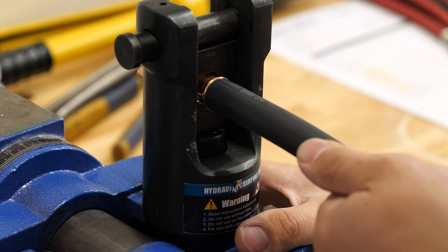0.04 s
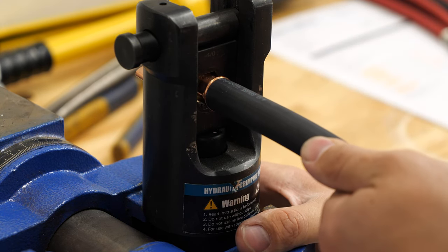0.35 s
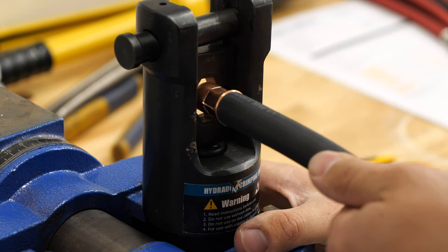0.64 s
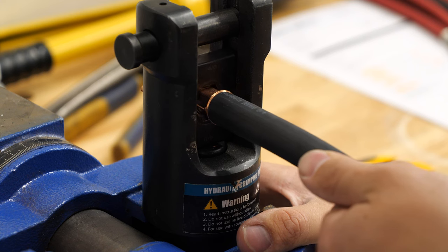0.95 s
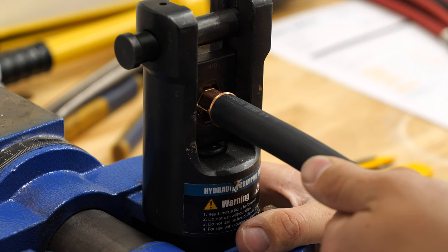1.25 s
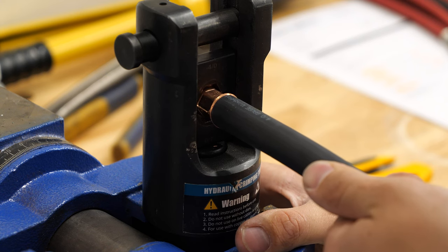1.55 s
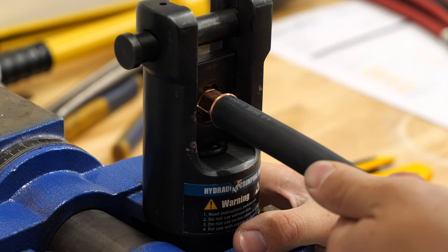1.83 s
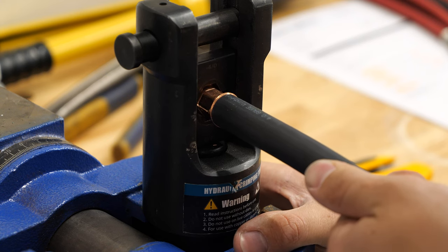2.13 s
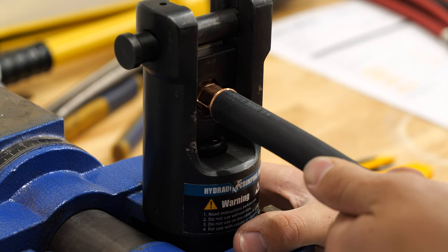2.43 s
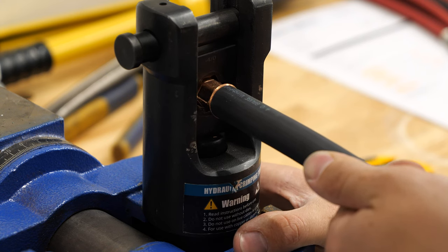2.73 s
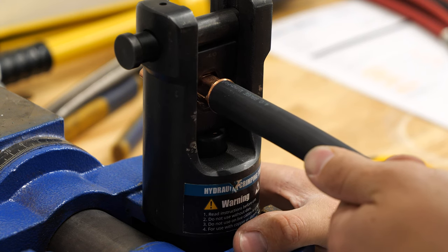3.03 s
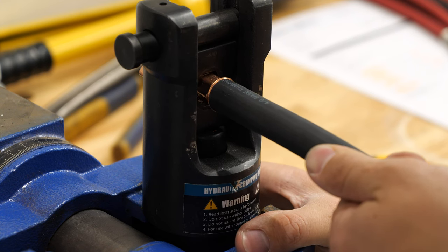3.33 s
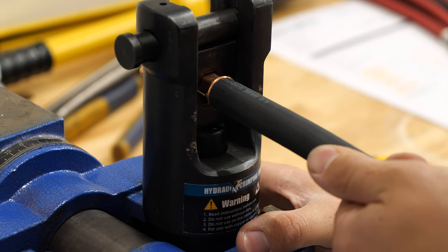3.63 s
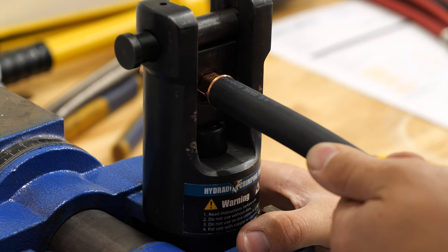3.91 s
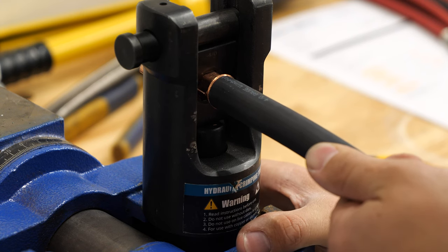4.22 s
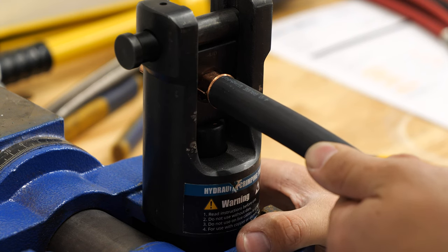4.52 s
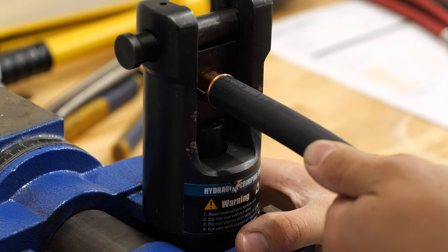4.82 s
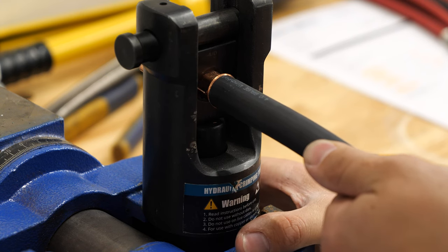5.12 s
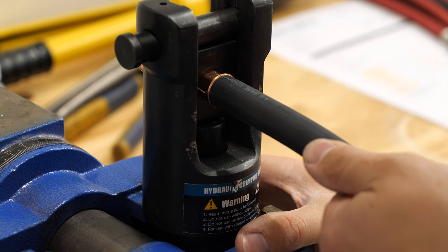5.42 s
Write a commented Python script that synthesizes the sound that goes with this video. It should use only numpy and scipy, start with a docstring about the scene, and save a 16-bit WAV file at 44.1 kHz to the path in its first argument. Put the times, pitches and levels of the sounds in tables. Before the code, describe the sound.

Small clicks and scrapes in a crimping tool, followed by a hydraulic foot pump's rapid clacking air bursts, slowing under load in a humming workshop.

```python
"""A workshop, one microphone close to a crimping tool, a machine humming steadily behind it.
First a cable lug is seated in the steel dies with a few taps, ticks, scrapes and faint squeaks.
At two seconds the air-driven hydraulic foot pump starts to close the tool: each stroke is a burst of
exhaust air cut short by the clack of the piston. The exhaust eases at first; then, as oil pressure
builds, the strokes come ever slower and blow harder."""
import sys
import numpy as np
from scipy import signal
from scipy.fft import rfft, irfft, next_fast_len
from scipy.io import wavfile
from scipy.ndimage import uniform_filter1d

SR = 44100
rng = np.random.default_rng(int(sys.argv[2]) if len(sys.argv) > 2 else 0)


def master_out(mix):
    """Clip the mix to full scale and print it as 16-bit PCM to the path in sys.argv[1]."""
    frames = np.transpose(np.atleast_2d(mix))
    ceiling = np.clip(frames, -1, 1)
    pcm = np.round(ceiling * 32767).astype(np.int16)
    wavfile.write(sys.argv[1], SR, pcm)


N = 245195
T = np.arange(N) / SR

# the pump cycles ever more slowly as the oil resists: time_s, cycle_s
PUMP_CYCLE = [(2.08, .06198), (2.77, .07343), (3.15, .07698), (3.3, .08391), (3.85, .0996), (4.02, .11017),
              (4.7, .17375), (4.85, .18733), (5.25, .23348)]


def piston():
    """The piston hits its stop and bounces, cracking and ringing the housing; the floor echoes it."""
    # strike and bounces on the stop, then a softer echo off the floor: delay_s, level_db
    arrivals = [(0.0, 2.5), (.0018, -0.5), (.004, -17), (.0058, -5), (0.011, -8)]
    # ring of the piston and its housing: pitch_hz, level_db
    housing_modes = [(3929, -16), (4791, -5), (5028, 0), (5211, -4), (6503, -5), (6750, -3), (7181, -2),
                     (7515, -2), (7795, -3), (8204, -5), (8430, -4), (8742, -7), (9119, -10), (10066, -12),
                     (10282, -11), (10637, -9), (11035, -8), (11854, -11), (12284, -12), (12467, -8),
                     (12704, -8), (14610, -14), (14922, -15), (15460, -14)]
    # crack of steel on steel: frequency_hz, density_db
    crack_spectrum = [(2500, -52), (3400, -43), (4400, -4), (5000, -6.5), (5700, -14.5), (7000, -0.5),
                      (8600, -0.5), (9600, -21), (12500, -7.5), (16000, -15.5)]
    _, strike_s, _, strike_db = strokes()
    pulses = 0
    for delay_s, db in arrivals:
        time_jitter, level_jitter = rng.standard_normal((len(strike_s), 2)).T
        arrival_s = strike_s + delay_s * (1 + 0.035 * time_jitter)
        pulses += clicks(arrival_s, strike_db + db + 150 * delay_s * level_jitter)
    impulse = clicks([0], [0])
    housing = sum((-1) ** k * from_db(db) * ring(impulse, hz, t60=.025)
                  for k, (hz, db) in enumerate(housing_modes))
    crack_energy = np.abs(convolve(pulses ** 2, dying(0.006) ** 2))
    crack = noise(crack_spectrum) * np.sqrt(crack_energy)
    # the main mode of the housing swells for two milliseconds after the first contact
    main_mode = ring(impulse, hz=5100, t60=.007) * (T / .0015) ** 2
    swell = convolve(clicks(strike_s, strike_db), main_mode)
    clack = from_db(-6) * convolve(pulses, housing) + from_db(3) * crack + from_db(5.5) * swell
    # so small a part radiates little below a few kilohertz
    return signal.sosfilt(signal.butter(3, 4000, "high", fs=SR, output="sos"), clack)


def exhaust(load):
    """A bright jet, the hollow tone of the muffler that grows with load, and a shudder of the body."""
    # escaping air: frequency_hz, density_db
    jet_spectrum = [(300, -16), (1900, -27), (2300, -25.5), (3200, -19.5), (4000, -9.5), (4400, -13),
                    (4800, -5.5), (5600, -12.5), (6700, -4.5), (8600, -5), (9500, -7.5), (11200, -7),
                    (14300, -15.5), (15600, -14.5)]
    # cavity resonances of the muffler: pitch_hz, width_hz, idle_db, full_load_db
    muffler_modes = [(487.7, 20, -53.5, -56), (629, 37, -53.5, -53.5), (900, 89, -53, -47),
                     (1019.6, 44, -47, -36), (1150.5, 25, -50, -42), (1515, 82, -47.5, -48.5),
                     (1729, 99, -43.5, -38), (1858, 28, -56.5, -46.5), (2455, 65, -55, -48),
                     (2820, 34, -57.5, -55)]
    # shaking pump body: frequency_hz, density_db
    shudder_spectrum = [(30, -6), (60, -5), (115, 4), (190, -17.5), (340, -6), (800, -11.5), (1500, -12)]
    _, _, air_db, _ = strokes()
    jet_flow = air_flow(air_db, rise_s=0.0038, hold_s=0.013, t60=0.079)
    jet = from_db(-0.43) * noise(jet_spectrum) * jet_flow
    # only a weak stroke, such as the first from rest, fails to drive the muffler and the body fully
    full_stroke_db = -31.5
    weak_db = np.minimum(air_db - full_stroke_db, 0)
    puff = air_flow(2 * weak_db, rise_s=0.0035, hold_s=0.0062, t60=0.063)
    hollow = 0
    for hz, width_hz, idle_db, full_db in muffler_modes:
        t60 = np.log(1000) / (np.pi * width_hz)
        drive = rng.standard_normal(N) * puff * from_db(idle_db + (full_db - idle_db) * load)
        hollow += ring(drive, hz, t60) * 2 * np.sqrt(np.pi * width_hz / SR)
    shaking = air_flow(weak_db, rise_s=0.0079, hold_s=0.037, t60=0.18)
    shudder = from_db(-45.5) * noise(shudder_spectrum) * shaking
    return jet + hollow + shudder


def air_flow(levels_db, rise_s, hold_s, t60):
    """Air blows from the opening of the valve until just after the strike, then the chamber empties."""
    flow = np.zeros(N)
    open_times, strike_times, _, _ = strokes()
    for open_s, strike_s, db in zip(open_times, strike_times, levels_db):
        part = slice(int((open_s - rise_s) * SR), int(open_s * SR) + SR // 4)
        opening = np.clip((T[part] - open_s) / rise_s + .5, 0, 1)
        emptying = dying(t60, np.maximum(T[part] - (strike_s + hold_s), 0))
        flow[part] += from_db(db) * opening * emptying
    return flow


def strokes():
    """One stroke from rest, then one each cycle; returns open_s, strike_s, air_db, strike_db."""
    # the stroke from rest, little air and a hard clack: strike_s, travel_s, air_db, strike_db
    first_stroke = (1.9976, .0176, -35.1, -13.9)
    # piston travel from the opening of the exhaust to the strike: time_s, travel_s
    travel = [(2.08, .026), (2.15, .0228), (2.4, .0195), (3.1, .017), (4.25, .019), (4.5, .0213),
              (5.5, .0245)]
    # the exhaust eases while the pump runs free, then blows harder with load: time_s, level_db
    air_level = [(2.08, -27.4), (3.15, -31.8), (3.45, -29.7), (3.9, -28.8), (4.25, -26.2), (5.5, -22.4)]
    # force of the strike, softer once the oil pushes back: time_s, level_db
    strike_level = [(2.08, -17.5), (2.5, -17.2), (3.35, -15.2), (3.9, -14.7), (4.03, -16), (4.53, -16.6),
                    (4.85, -15.5), (5.5, -17.5)]
    rows = [first_stroke]
    time_s = 2.0815  # the pump falls into its rhythm
    while time_s < T[-1]:
        rows.append((time_s, along(travel, time_s), along(air_level, time_s), along(strike_level, time_s)))
        time_s += along(PUMP_CYCLE, time_s)
    strike_s, travel_s, air_db, strike_db = np.transpose(rows)
    return strike_s - travel_s, strike_s, air_db, strike_db


def oil_load(idle_cycle_s=.08, loaded_cycle_s=.19):
    """Share of full load, 0-1: the slower the pump, the higher the pressure it works against."""
    return np.clip((along(PUMP_CYCLE, T) - idle_cycle_s) / (loaded_cycle_s - idle_cycle_s), 0, 1)


def jolt():
    """One dull, rattling clunk as the exhaust valve opens for the second stroke."""
    # the valve thrown open for the second stroke: start_s, level_db
    kick = [(2.056, -25)]
    clunk = noise([(100, -12), (400, -4.5), (1600, -3), (3000, -11), (9000, -9.5)]) * dying(0.037)
    return convolve(clicks(*np.transpose(kick)), clunk)


def tool_taps():
    """Light knocks rattle and ring the steel head of the crimper; a softer knock is duller."""
    # taps on the tool: start_s, level_db, cutoff_hz
    taps = [(0.293, -27.5, 7000), (.303, -30, 6000), (1.0139, -20.5, 16000)]
    # ring of the tool head: pitch_hz, level_db, t60_s
    head_modes = [(357, -10, 0.17), (963, -9.5, 0.084), (1310, -6.5, 0.13), (1590, -8, 0.11),
                  (2060, -13.5, 0.22), (2775, -8, 0.12), (3740, -13, 0.075), (5840, -9, 0.066),
                  (7009, -11, 0.041), (8350, -6, .05), (11700, -13, .04), (12510, -4, .07),
                  (13800, -2, .04)]
    knocks = sum(soften(clicks([start_s], [db]), hz, order=1) for start_s, db, hz in taps)
    rings = sum((-1) ** k * from_db(db) * ring(knocks, hz, t60)
                for k, (hz, db, t60) in enumerate(head_modes))
    rattle = noise([(400, -4), (1500, -9), (4000, -4.5), (8000, 5), (14000, 5.5), (16000, -9)])
    return from_db(-11) * rings + from_db(-7) * convolve(knocks, rattle * dying(0.097))


def lug():
    """The copper lug snaps and slides into its seat: short gritty contacts and grainy scrapes."""
    # the lug clicks in the dies: start_s, level_db, cutoff_hz
    ticks = [(.496, -30, 6000), (.517, -22.5, 14000), (.5538, -21, 15000), (.556, -17, 15000),
             (.565, -25, 11000), (.622, -22, 7200), (.641, -32, 7000), (.687, -28, 6000), (.712, -32, 7500),
             (.744, -33, 14000), (1.289, -35, 14000)]
    # ring of the lug: pitch_hz, level_db, t60_s
    lug_modes = [(6520, -5.5, 0.012), (7850, 2, 0.0024), (11170, 4.5, 0.0015), (14000, -4, 0.0028)]
    # the lug slides in the dies: start_s, end_s, level_db
    slides = [(0.734, .77, -46.5), (0.792, 0.892, -42), (1.14, 1.238, -48.5)]
    # sliding metal: frequency_hz, density_db
    scrape_spectrum = [(1000, -3), (3200, -11), (4200, -7), (4750, 2.5), (5600, -3), (8000, 3),
                       (11000, 1.5), (16000, -17)]
    contacts = np.zeros(N)
    for start_s, db, cutoff_hz in ticks:
        grit = rng.standard_normal(N) * dying(0.023, T - start_s)
        contacts += from_db(db) * soften(grit / np.linalg.norm(grit), cutoff_hz, order=3)
    # the small lug radiates the change of force, so its own click is bright
    snap = np.diff(contacts, prepend=0)
    rings = sum(from_db(db) * ring(snap, hz, t60) for hz, db, t60 in lug_modes)
    rubbing = sum(from_db(db) * np.sin(np.pi * progress(start, end)) for start, end, db in slides)
    catches = rng.exponential(1, N) * (rng.random(N) < 500 / SR)  # about 500 a second
    grains = rms_one(uniform_filter1d(catches, size=50))
    scrapes = rubbing * noise(scrape_spectrum) * (.5 + .5 * grains)
    return from_db(-3) * rings + from_db(5.5) * snap + scrapes


def squeaks():
    """The cable is pushed home with faint, unsteady tones that sag in pitch."""
    # low squeaks of the cable: start_s, end_s, start_hz, end_hz, level_db
    glides = [(0.517, 0.577, 510, 500, -54), (0.602, 0.66, 945, 926, -53), (0.638, 0.726, 485, 445, -55.5)]
    waver = noise([(30, -5), (120, -8), (400, -60)])
    out = 0
    for start_s, end_s, start_hz, end_hz, db in glides:
        glide = progress(start_s, end_s)
        phase = 2 * np.pi * np.cumsum(start_hz + (end_hz - start_hz) * glide) / SR
        out += np.sqrt(2) * from_db(db) * np.sin(np.pi * glide) * np.sin(phase + 0.59 * waver)
    return out


def machine_hum(shaft_hz=44.43):
    """A motor hums on multiples of its shaft rate; the rush of air throbs a little with each turn."""
    # partials of the motor: shaft_multiple, rms_db
    partials = [(1, -50), (2, -50), (3, -58), (4, -53), (5, -66), (7, -60), (8, -69), (13, -70), (14, -68),
                (17, -62), (22, -67), (23, -64), (25, -69), (26, -68), (34, -69), (36, -73), (50, -72)]
    # workshop air: frequency_hz, density_db
    air_spectrum = [(25, 9.5), (60, -0.5), (120, 0), (250, -4), (400, -10.5), (700, -8.5), (1050, -6.5),
                    (1350, -9.5), (2200, -11), (3200, -19), (4800, -16), (7000, -21), (10300, -13),
                    (11500, -24), (16000, -21.5)]
    turn = 2 * np.pi * shaft_hz * T
    hum = sum(np.sqrt(2) * from_db(db) * np.cos(k * turn + rng.uniform(0, 2 * np.pi))
              for k, db in partials)
    throb = 1 + 0.096 * np.cos(turn)
    return hum + from_db(-50.5) * noise(air_spectrum) * throb


def workshop(x, t60, wet_db):
    """The direct sound reaches the microphone first; diffuse reverberation builds up 4 ms behind it."""
    # colour of the room: frequency_hz, density_db
    room_spectrum = [(100, 16.5), (1000, 0), (3000, -0.5), (7000, 0.5), (16000, -6.5)]
    tail = noise(room_spectrum) * dying(t60) * progress(.004, .0091)
    return x + from_db(wet_db) * convolve(x, tail / np.linalg.norm(tail))


def from_db(db):
    """Decibels to gain."""
    return 10 ** (np.asarray(db) / 20)


def rms_one(x):
    """Scale to an rms of 1."""
    return x / np.sqrt(np.mean(x ** 2) + 1e-20)


def noise(spectrum):
    """Steady noise of rms 1, shaped by rows of frequency_hz, density_db."""
    hz, db = np.transpose(spectrum)
    size = next_fast_len(N)
    bin_hz = np.maximum(np.fft.rfftfreq(size, 1 / SR), 1)
    gain = from_db(np.interp(np.log(bin_hz), np.log(hz), db))
    return rms_one(irfft(rfft(rng.standard_normal(size)) * gain)[:N])


def ring(x, hz, t60):
    """One resonance: a unit click sets a sine of height 1 ringing."""
    radius, angle = from_db(-60 / (t60 * SR)), 2 * np.pi * hz / SR
    return signal.lfilter([0, np.sin(angle)], [1, -2 * radius * np.cos(angle), radius ** 2], x + 1e-18)


def soften(x, cutoff_hz, order):
    """Low-pass that dulls a contact."""
    return signal.sosfilt(signal.butter(order, cutoff_hz, fs=SR, output="sos"), x + 1e-18)


def dying(t60, t=T):
    """Exponential decay from t = 0, down 60 dB after t60 seconds."""
    return np.exp(-np.log(1000) * np.clip(t / t60, 0, 10)) * (t >= 0)


def progress(start_s, end_s):
    """Ramp from 0 to 1 between two times."""
    return np.clip((T - start_s) / (end_s - start_s), 0, 1)


def clicks(times, db):
    """Single-sample clicks."""
    out = np.zeros(N)
    np.add.at(out, np.round(np.asarray(times) * SR).astype(int), from_db(db))
    return out


def convolve(x, response):
    """Pass x through the first second of an impulse response."""
    return signal.fftconvolve(x, response[:SR])[:N]


def along(curve, t):
    """Value of a control curve at time t."""
    return np.interp(t, *np.transpose(curve))


def scene():
    """The exhaust fills the room; clacks and tool sound closer to the microphone; the hum lies behind."""
    roomy = workshop(exhaust(oil_load()) + jolt(), t60=0.32, wet_db=-10.5)
    close = workshop(piston() + tool_taps() + lug() + squeaks(), t60=.4, wet_db=-17)
    return (roomy + close + machine_hum())[None]


def record(dry):
    """The microphone channel rounds the highest peaks and cuts the top steeply."""
    ceiling, cutoff_hz = 1.2, 15680
    rounded = ceiling * np.tanh(dry / ceiling)
    return signal.sosfilt(signal.ellip(10, .1, 70, cutoff_hz, fs=SR, output="sos"), rounded)


dry = scene()
out = record(dry)
master_out(out)
```